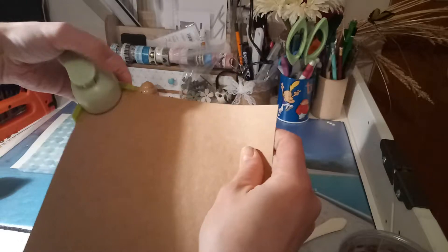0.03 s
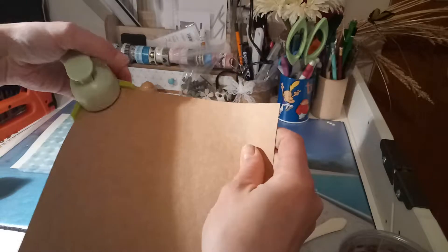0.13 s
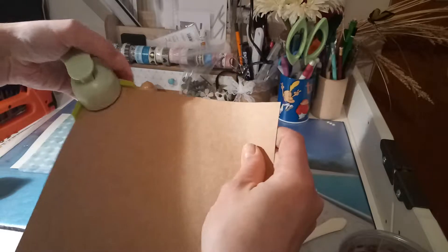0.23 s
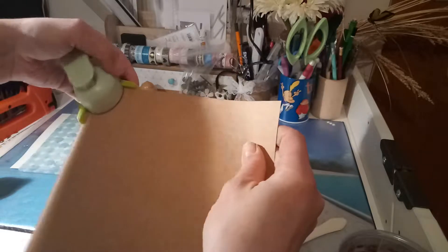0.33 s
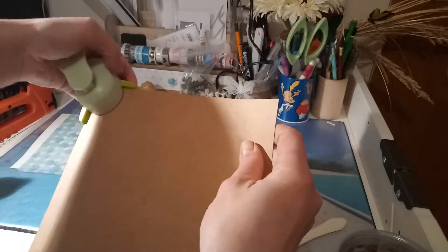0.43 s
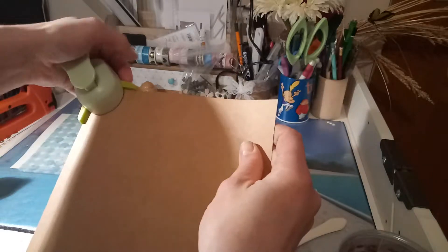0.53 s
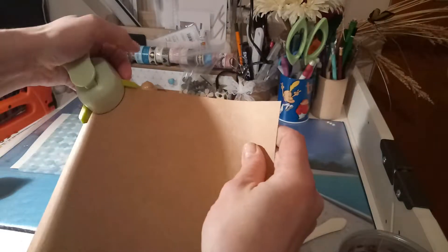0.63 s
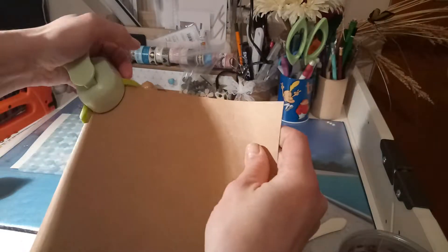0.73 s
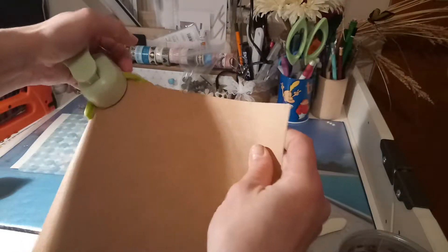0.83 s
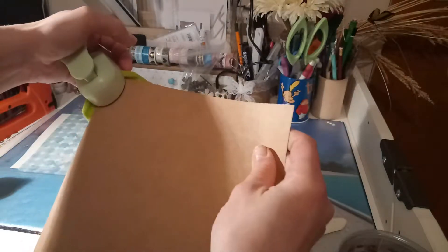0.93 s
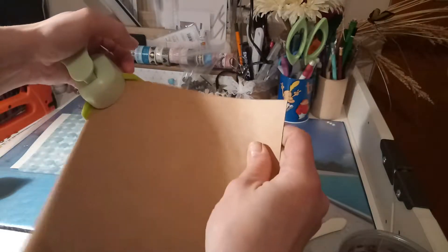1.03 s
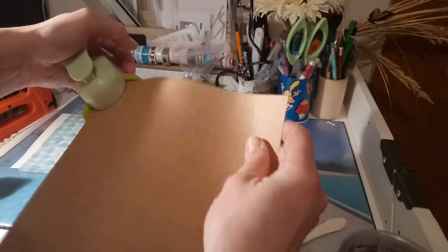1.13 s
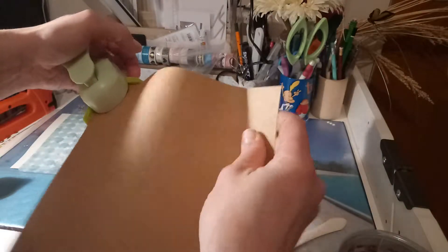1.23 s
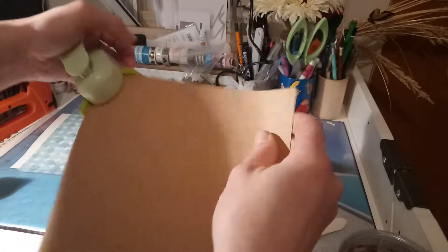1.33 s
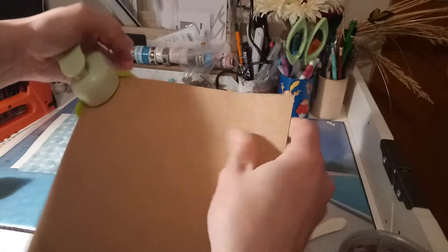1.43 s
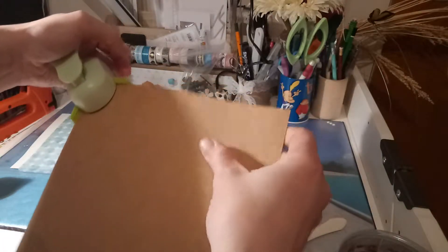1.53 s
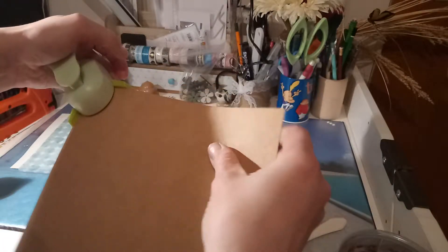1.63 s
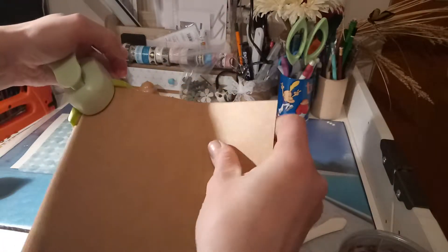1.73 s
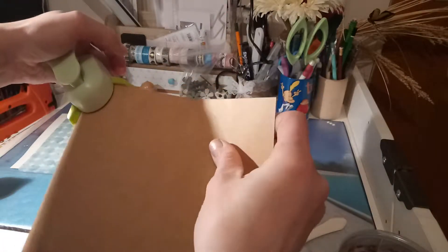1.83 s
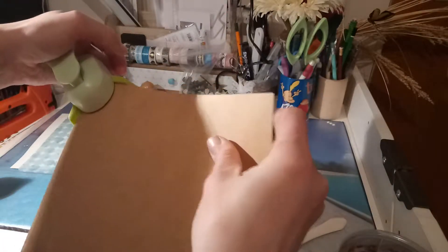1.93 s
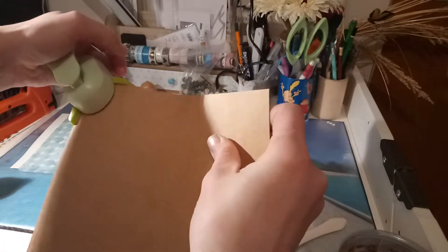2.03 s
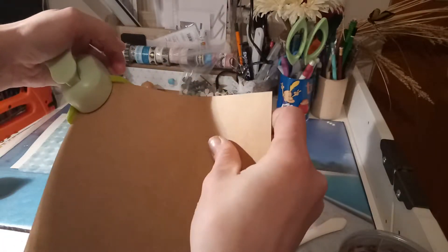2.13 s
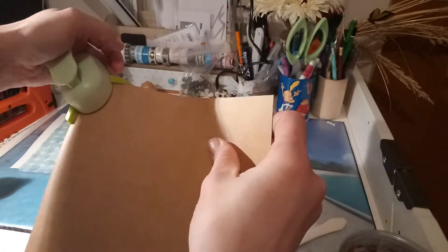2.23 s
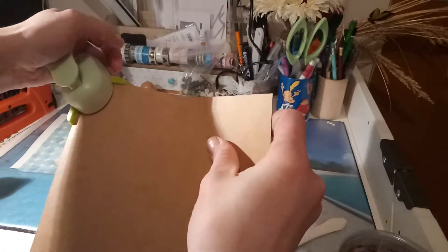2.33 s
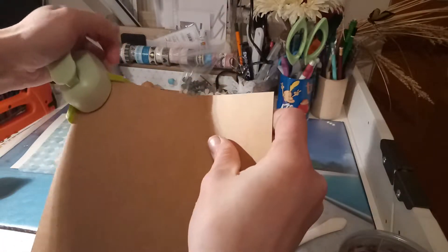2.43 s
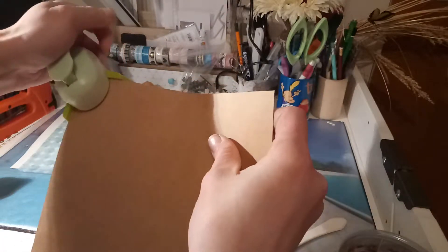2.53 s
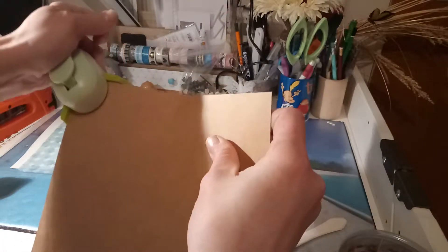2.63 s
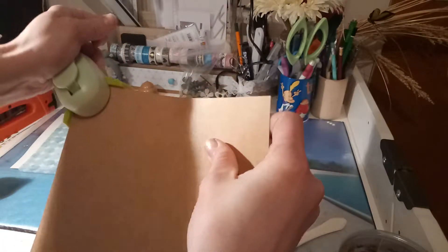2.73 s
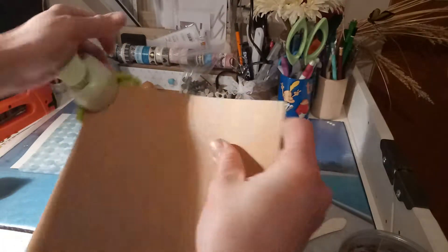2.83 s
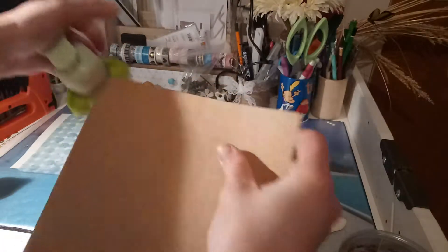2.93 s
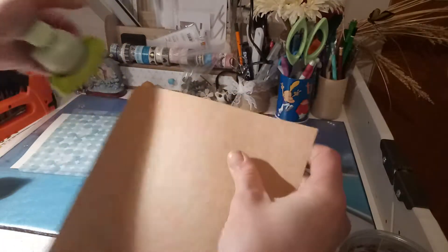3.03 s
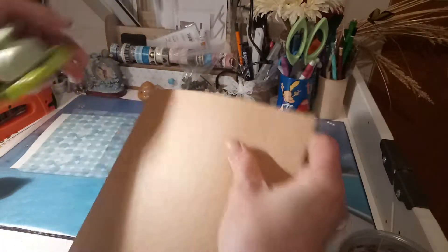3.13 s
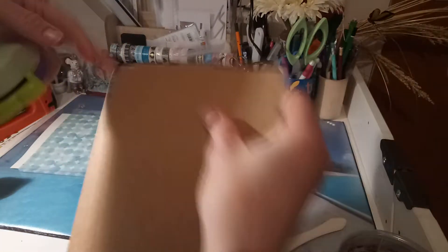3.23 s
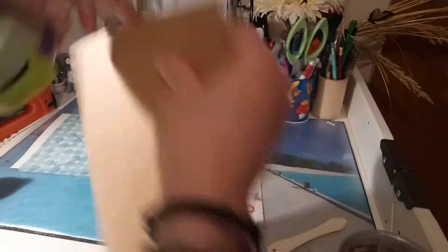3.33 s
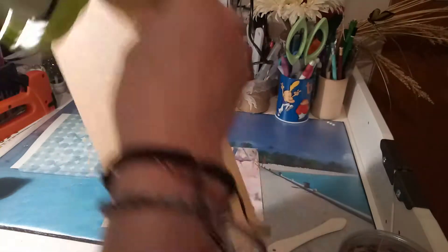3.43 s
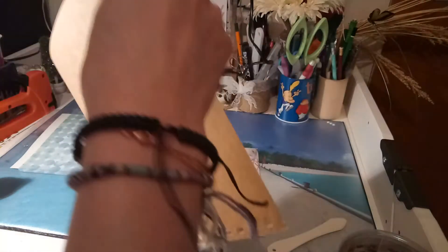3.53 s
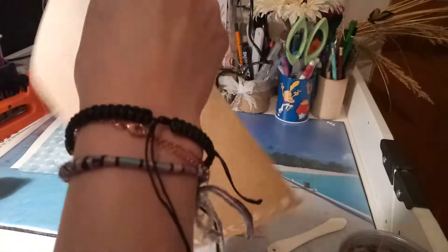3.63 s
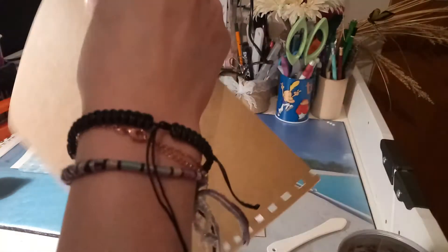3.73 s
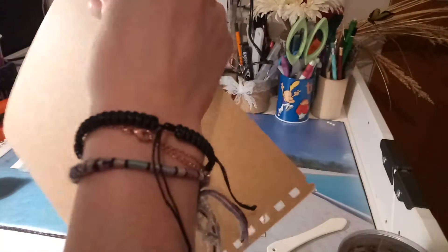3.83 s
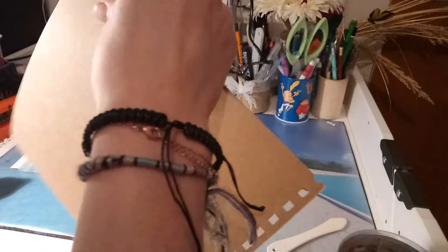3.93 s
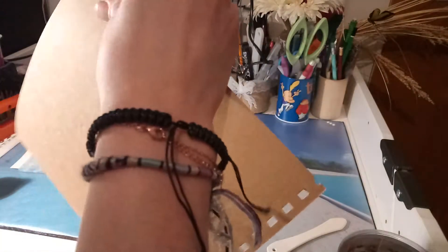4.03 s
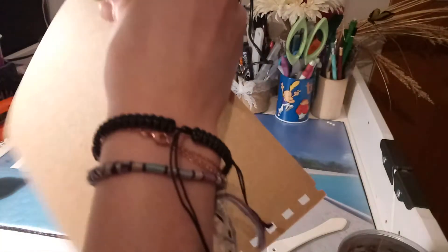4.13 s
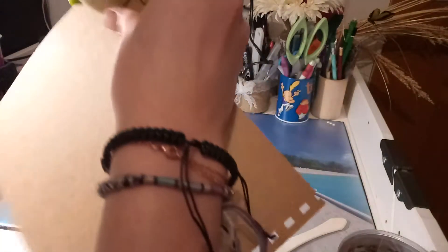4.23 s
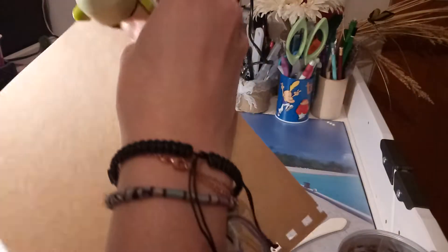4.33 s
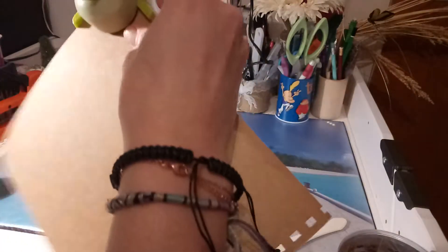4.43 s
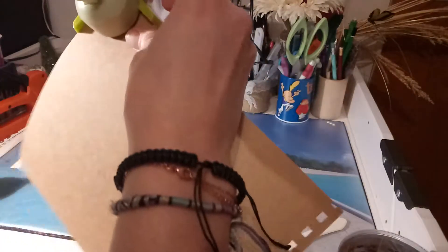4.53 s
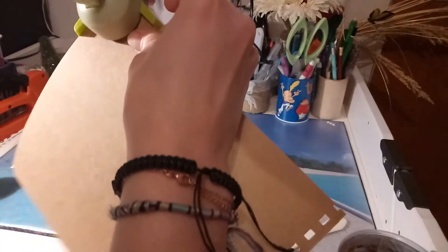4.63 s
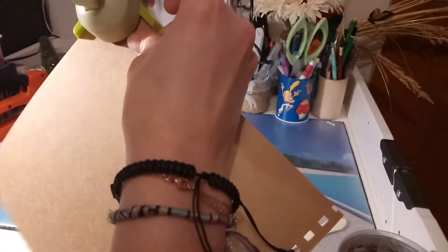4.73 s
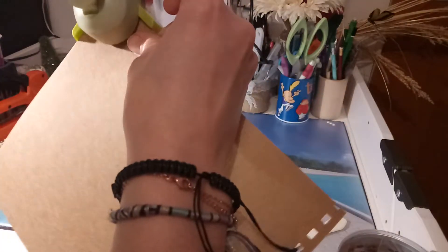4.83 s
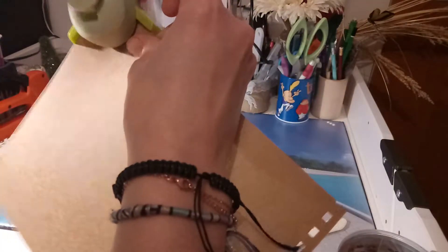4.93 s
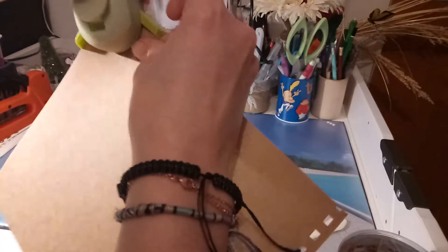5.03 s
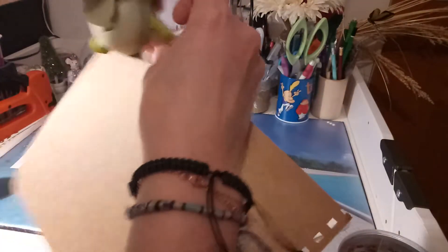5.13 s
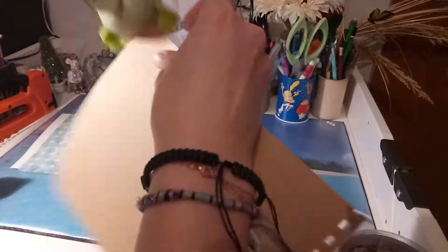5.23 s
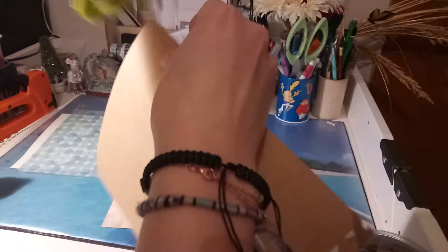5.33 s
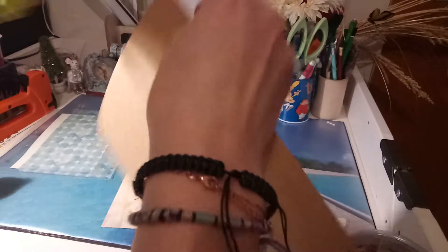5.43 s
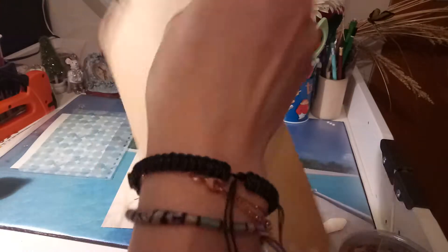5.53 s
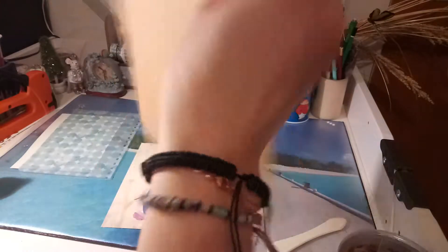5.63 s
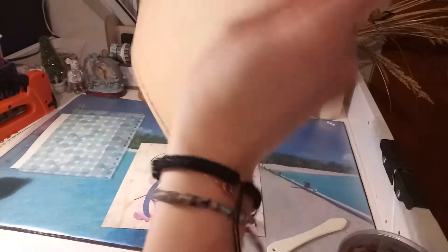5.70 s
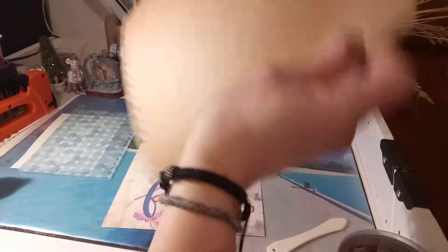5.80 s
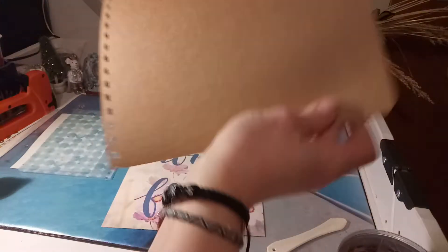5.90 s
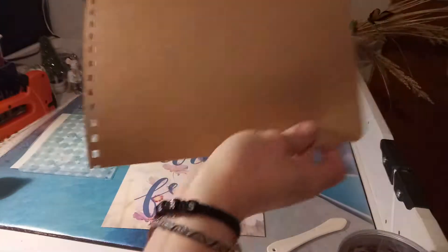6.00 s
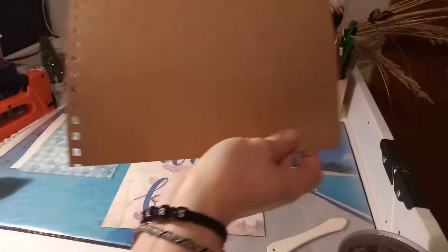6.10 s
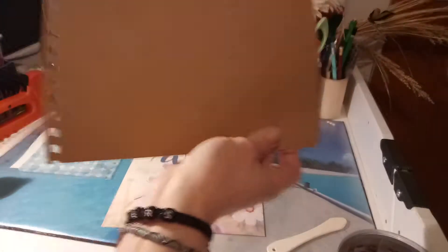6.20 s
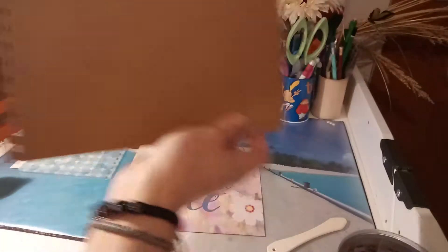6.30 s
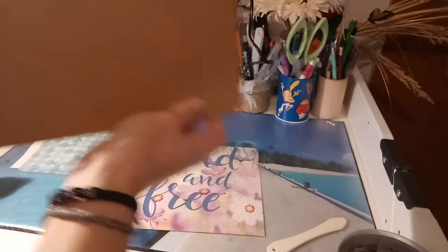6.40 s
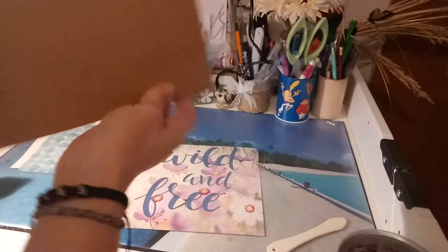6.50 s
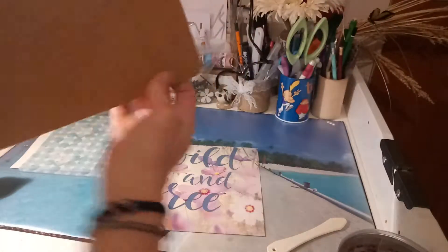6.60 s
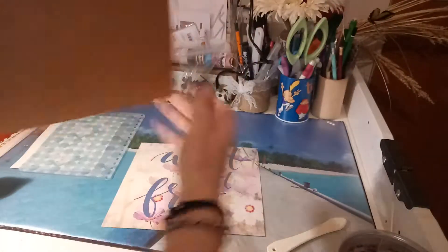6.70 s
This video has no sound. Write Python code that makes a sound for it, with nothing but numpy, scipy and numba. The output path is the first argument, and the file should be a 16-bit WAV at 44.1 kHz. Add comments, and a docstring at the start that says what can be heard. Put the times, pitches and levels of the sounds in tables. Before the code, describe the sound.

A stiff sheet is pushed into a plastic corner punch, with dry scrapes, small knocks and buckling pops. The punch cracks through with a quick double clack, the sheet is turned with rustles and hisses, then a second cut clacks. Finally the sheet is swung away with a loud, fluttering flap. Close phone microphone, small room, sound mostly from the right.

```python
"""At a desk in a small room, a sheet of kraft paper is worked into a plastic corner punch and cut twice.
The sheet hisses and scrapes as filtered noise made of tiny catches, and wobbles as short fluttering tones.
Buckles, creases and knocks are short filtered bursts; the punch cracks through the fibres and clacks back.
A phone close by hears the paper and punch mostly from the right, over a faint rumble and hiss."""
import sys
import numpy as np
from scipy import signal
from scipy.fft import rfft, irfft
from scipy.io import wavfile
from scipy.ndimage import uniform_filter1d, minimum_filter1d, map_coordinates
from numba import njit

SR = 44100
rng = np.random.default_rng(int(sys.argv[2]) if len(sys.argv) > 2 else 0)


def store_pcm(level_fs):
    """Save levels as 16-bit WAV."""
    pcm = np.round(np.clip(level_fs, -1, 1) * 32767).astype(np.int16)
    wavfile.write(sys.argv[1], SR, np.atleast_2d(pcm).T)


N = 298116
TIME = np.arange(N) / SR


def undb(db):
    """Turn decibels into gain."""
    return 10 ** (np.asarray(db) / 20)


def unit(x):
    """Scale to unit energy."""
    return x / np.sqrt(np.sum(x ** 2))


def read(points, hz):
    """Read a colour table between its points, on a log-frequency axis."""
    f, value = np.transpose(points)
    return np.interp(np.log(np.maximum(hz, 1)), np.log(f), value)


def response(colour, thud_db=0, bright_db=0, pop_hz=1250, pop_db=0, octaves=1.0, size=2048):
    """Filter for a colour plus a bass shelf, a treble shelf and one broad resonance; it never sounds early."""
    hz = np.arange(size // 2 + 1) * SR / size
    thud = thud_db / (1 + (hz / 620) ** 4)
    bright = bright_db * (1 - 1 / (1 + (hz / 2900) ** 4))
    pop = pop_db * np.exp(-(np.log2((hz + 1) / pop_hz) / octaves) ** 2)
    # folding the cepstrum gives minimum phase: the energy comes as early as it can
    cepstrum = irfft(np.log(undb(read(colour, hz) + thud + bright + pop)))
    cepstrum[1:size // 2] *= 2
    cepstrum[size // 2 + 1:] = 0
    return unit(irfft(np.exp(rfft(cepstrum))))


def through(x, ir):
    """Convolve, keeping the length."""
    return signal.fftconvolve(x, ir)[:len(x)]


def add(track, s, sound):
    """Mix a stereo sound into the track at a time in seconds."""
    start = max(int(s * SR), 0)
    track[:, start:start + sound.shape[1]] += sound[:, :N - start]


def walk(rate):
    """A random line that wanders around zero, with a new target `rate` times a second."""
    k = int(SR / rate)
    steps = np.repeat(rng.standard_normal(N // k + 1), k)
    return 2.0 * uniform_filter1d(steps, k)[:N]


def swell(s, rise_s, fall_s, shape=1.62):
    """Power of one movement: it gathers speed, then slows; shape 1 is a pointed swell, 2 a bell."""
    u = TIME - s
    near = (u > -4 * rise_s) & (u < 4 * fall_s)
    power = np.zeros(N)
    power[near] = np.exp(-2 * np.maximum(-u[near] / rise_s, u[near] / fall_s) ** shape)
    return power


# faint background: f/Hz, level/dB
QUIET_COLOUR = [(30, -0.5), (130, 7.5), (400, -4), (600, -6.5), (1450, -9.5), (6900, -9.5), (9000, -21),
                (13700, -29), (14800, -3), (16000, -9)]


def quiet(level_db=-63.5, left_db=-3):
    """Faint room rumble and microphone hiss: separate noise in each port, the left one softer."""
    both = np.array([through(rng.standard_normal(N), response(QUIET_COLOUR)) for _ in range(2)])
    return both * undb(level_db + np.array([[left_db], [0]]))


PORT_LAG = 10  # samples by which the left port hears the direct sound later
BASS_SHADE_DB = -4  # bass in the left port against the right
ROOM_T60_LOW_S, ROOM_T60_HIGH_S = 0.41, 0.3  # time for the bass and the treble to fade by 60 dB


def room(wet_db, left_db, near_db=-2, near_s=0.0029, build_s=0.0015, split_hz=700, size=12288):
    """Paths from one spot to the two ports: direct sound, then echoes off desk clutter and walls."""
    t = np.arange(size) / SR
    noise = rng.standard_normal((2, size))
    low_pass = signal.butter(1, split_hz, fs=SR)
    bass = signal.lfilter(*low_pass, noise)
    bass_fade = np.exp(-np.log(1000) * t / ROOM_T60_LOW_S)
    treble_fade = np.exp(-np.log(1000) * t / ROOM_T60_HIGH_S)
    walls = bass * bass_fade + (noise - bass) * treble_fade
    # the walls answer from all around, so they lean less to one side
    sides = np.array([[1], [-1]]) / 2
    walls = walls * undb(-sides * left_db / 2)
    clutter = noise * abs(noise) * np.exp(-t / near_s) * (t > .001)
    echoes = unit(walls * (1 - np.exp(-t / build_s))) + undb(near_db) * unit(clutter)
    direct = np.array([signal.unit_impulse(size, PORT_LAG), signal.unit_impulse(size)])
    paths = np.sqrt(2) * unit(unit(direct) + undb(wet_db) * unit(echoes))
    shaded = paths + (undb(sides * BASS_SHADE_DB) - 1) * signal.lfilter(*low_pass, paths)
    return shaded * undb(sides * left_db)


def place(x, wet_db, left_db):
    """Put a short sound at its own spot on the desk; left_db is the left level against the right."""
    return signal.fftconvolve(x[None], room(wet_db, left_db), axes=1)


def roam(x, wet_db, left_db, size=16384):
    """Cross-fade a long sound through freshly drawn echoes, as if its spot kept moving."""
    out, padded = np.zeros((2, N)), np.pad(x, (0, size))
    for start in range(0, N, size // 2):
        fade = signal.windows.hann(size, sym=False)
        if start == 0:
            fade[:size // 2] = 1
        add(out, start / SR, place(padded[start:start + size] * fade, wet_db, left_db))
    return out


# the hand pushes the sheet along:
# t/s at the fastest, speeding up/s, slowing down/s, level/dB, edge scrape against the slide/dB
STROKES = [(0.026, 0.033, 0.029, -47, -1.5), (.213, 0.014, 0.026, -48, -23),
           (0.459, 0.041, 0.015, -53.5, -9), (.94, 0.071, 0.051, -55.5, 3),
           (1.074, 0.034, 0.017, -43, -4.5), (1.222, 0.021, 0.017, -47, 3.5),
           (1.56, 0.11, 0.027, -42.5, -2.5), (1.715, 0.21, 0.084, -52, 2.5),
           (2.032, 0.028, 0.0087, -46.5, 0.5), (2.212, 0.012, 0.013, -47.5, -11.5),
           (2.612, 0.065, 0.011, -60.5, 1), (2.964, 0.092, 0.12, -45.5, 1.5),
           (3.133, 0.027, 0.041, -40.5, -2), (3.35, 0.28, 0.0073, -53.5, 6),
           (3.513, 0.13, 0.036, -41.5, -8.5), (3.673, 0.027, 0.073, -43, -7.5),
           (3.78, 0.055, 0.028, -45, -4), (3.899, 0.09, 0.025, -52, -1.5),
           (4.139, 0.11, 0.074, -42.5, -7.5), (4.381, 0.045, 0.034, -40, -5.5),
           (4.569, 0.036, 0.011, -49.5, 1.5), (5.324, 0.094, 0.0075, -35, -5),
           (5.66, 0.048, 0.088, -48, -10), (5.769, 0.14, 0.018, -47.5, -4), (5.905, 0.07, 0.021, -46, -6.5),
           (6.07, 0.022, 0.056, -41, -4), (6.242, 0.042, 0.059, -31.5, 1), (6.57, 0.072, 0.11, -55, 1.5),
           (6.737, 0.026, 0.01, -42.5, -13)]
# fingers keep the held sheet stirring faintly: start t/s, end t/s, level/dB
GRIPS = [(0.86, 1.975, -60), (2.703, 4.676, -64.5)]
# the sheet is bent and settles with a low rustle: t/s, level/dB before the flex trim, settling/s
FLEXES = [(.04, -46, 0.063), (0.476, -52, 0.033), (.89, -56, 0.28), (1.44, -44.5, 0.11),
          (1.719, -40, 0.075), (2.12, -43, 0.025), (2.98, -47.5, 0.13), (3.35, -45.5, 0.12),
          (3.696, -46, 0.02), (5.638, -48, 0.057), (6.26, -33.5, 0.052), (6.65, -41, 0.055)]
GRIP_FADE_S, FLEX_RISE_S = 0.0293, 0.022
STROKE_RIPPLE_DB = -8  # a scraping edge sets small ripples going in the sheet
# every snap or clack leaves the sheet shivering: levels against its table level
SHIVER_EDGE_DB, SHIVER_RIPPLE_DB, SHIVER_FLEX_DB = -16, -18.5, -24.5
SHIVER_RISE_S, SHIVER_FALL_S = 0.0013, 0.038


def handling():
    """Levels in dB of slide, scrape, ripple and flex: strokes, grip, bends and shivers add in power."""
    slide, scrape = np.zeros((2, N))
    for s, rise_s, fall_s, db, edge_db in STROKES:
        stroke = swell(s, rise_s, fall_s) * undb(db) ** 2
        slide += stroke
        scrape += stroke * undb(edge_db) ** 2
    for start, end, db in GRIPS:
        held = 1. * ((TIME > start) & (TIME < end))
        grip = uniform_filter1d(held, int(GRIP_FADE_S * SR)) * undb(db) ** 2
        slide += grip
        scrape += grip
    ripple = scrape * undb(STROKE_RIPPLE_DB) ** 2
    flex = sum(swell(s, FLEX_RISE_S, settle_s) * undb(db) ** 2 for s, db, settle_s in FLEXES)
    shiver = np.zeros(N)
    for s, db, *_ in SNAPS + CLACKS:
        shiver += swell(s + 2 * SHIVER_RISE_S, SHIVER_RISE_S, SHIVER_FALL_S) * undb(db) ** 2
    scrape = scrape + shiver * undb(SHIVER_EDGE_DB) ** 2
    ripple = ripple + shiver * undb(SHIVER_RIPPLE_DB) ** 2
    flex = flex + shiver * undb(SHIVER_FLEX_DB) ** 2
    return 10 * np.log10(np.array([slide, scrape, ripple, flex]) + 1e-12)


def friction(db, colour, grain_db, slip_db, slip_rate, catches_per_s=SR / 4):
    """Tiny catches of paper fibre, of random sizes, coming in uneven slips."""
    sizes = undb(grain_db * np.minimum(rng.exponential(1, N), 7))
    catches = rng.standard_normal(N) * sizes * (rng.random(N) < catches_per_s / SR)
    level = undb(db + slip_db * walk(slip_rate))
    return through(catches / catches.std() * level, response(colour))


def buckle(x, patchy_db=2.2, per_s=45, per_octave=1.5):
    """As the sheet bends, its contact patches come and go, each with its own colour."""
    hz, t, frames = signal.stft(x, SR)
    octave = np.log2(np.maximum(hz, hz[1]) / hz[1])
    spots = np.meshgrid(octave * per_octave, t * per_s, indexing="ij")
    patches = map_coordinates(rng.standard_normal(frames.shape), spots)
    return signal.istft(frames * undb(patchy_db * patches), SR)[1][:N]


# low rustle of the bent sheet, and its small ripples: f/Hz, level/dB
FLEX_COLOUR = [(60, -5), (125, 6.5), (320, -2), (600, -8.5), (1200, -59)]
RIPPLE_COLOUR = [(60, -27.5), (200, -8.5), (390, 7.5), (720, -1), (1300, -35)]


def bending(ripple_db, flex_db):
    """The flexing sheet rustles low, with small ripples above."""
    ripple = friction(ripple_db, RIPPLE_COLOUR, grain_db=3, slip_db=1.4, slip_rate=40)
    flex = friction(flex_db, FLEX_COLOUR, grain_db=2.5, slip_db=1.4, slip_rate=34)
    return roam(undb(-2.5) * flex + ripple, wet_db=-5.5, left_db=-5.5)  # -2.5 is the flex trim


# the bent sheet wobbles: t/s at the crest, level/dB, pitch f/Hz, half length/s
WOBBLES = [(0.821, -53, 142, 0.013), (1.433, -35, 242, 0.0042), (1.445, -40, 165.6, 0.023),
           (1.719, -51, 198, 0.01), (2.965, -42.5, 195, 0.01), (6.059, -35, 159, 0.011),
           (6.095, -38, 123, 0.014), (6.222, -27.5, 254.5, 0.011), (6.262, -27.5, 356, 0.011),
           (6.283, -27, 350.5, 0.023)]
# bending modes of the sheet: multiple of the pitch, level/dB
BENDS = [(0.998, 3), (1.81, -9.5)]


def wobbles(rough=0.2):
    """Bending modes swell, flutter and die as the sheet swings."""
    out = np.zeros(N)
    for multiple, mode_db in BENDS:
        flutter = 1 + rough * multiple * walk(130)
        for s, db, hz, half_s in WOBBLES:
            near = abs(TIME - s) < 4 * half_s
            since = TIME[near] - s
            bell = np.exp(-(since / half_s) ** 2 / 2)
            phase = 2 * np.pi * (multiple * hz * since + rng.random())
            out[near] += undb(db + mode_db) * bell * np.sin(phase) * flutter[near]
    return out


# the sliding sheet, and its bright swish: f/Hz, level/dB
SLIDE_COLOUR = [(1200, -12), (2600, 0.5), (4000, -0.5), (6600, 4), (8200, -9.5), (10500, -22), (13800, -46),
                (15000, -4), (16000, -55)]
SWISH_COLOUR = [(4000, -27.5), (7000, 7), (11500, -9.5), (15000, -6)]
# the sheet sweeps flat over the mat with a bright swish: t/s at the fastest, half length/s, level/dB
SWEEPS = [(0.45, 0.05, -61), (1.55, 0.055, -45), (3.135, 0.035, -47), (3.515, 0.07, -42),
          (5.31, 0.035, -42)]
# dB per dB of sliding, dB per dB of sliding over scraping, offset in dB
SWISH_GROWTH, SWISH_FLATNESS, SWISH_DB = 1.438, 0.093, 9


def rubbing(slide_db, scrape_db):
    """The flat sheet slides; a fast, flat stroke is brighter as its bright swish grows quicker."""
    slide = friction(slide_db, SLIDE_COLOUR, grain_db=4.5, slip_db=1.1, slip_rate=90)
    swish_db = SWISH_GROWTH * slide_db + SWISH_FLATNESS * (slide_db - scrape_db) + SWISH_DB
    sweeps = sum(swell(s, half_s, half_s) * undb(db) ** 2 for s, half_s, db in SWEEPS)
    swish_db = 10 * np.log10(undb(swish_db) ** 2 + sweeps)
    swish = friction(swish_db, SWISH_COLOUR, grain_db=3.5, slip_db=.9, slip_rate=60)
    return roam(buckle(slide) + swish, wet_db=11.5, left_db=-7.0)


# the edge drags on the punch and the desk:
# t/s at the hardest push, building up/s, dying/s, level/dB, pitch f/Hz at the hardest push
DRAGS = [(0.455, 0.074, 0.071, -57.5, 1490), (1.232, 0.035, 0.024, -46.5, 510),
         (3.201, 0.034, 0.014, -45.5, 1240), (4.149, 0.11, 0.017, -42.5, 1170)]
DRAG_WIDTH, DRAG_RISE_OCT_PER_S = 0.35, 0.47  # width as a share of the pitch; climb in octaves per s


def drags():
    """Catches of a dragged edge ring one resonance, which climbs as the push stiffens the sheet."""
    out = np.zeros(N)
    for s, rise_s, fall_s, db, hz in DRAGS:
        power = swell(s, rise_s, fall_s)
        near = power > 0
        pitch = hz * 2 ** (DRAG_RISE_OCT_PER_S * (TIME[near] - s))
        turn = np.exp(2j * np.pi * np.cumsum(pitch) / SR)
        catches = rng.laplace(size=len(turn)) * rng.exponential(size=len(turn))
        # shift the pitch down to zero, low-pass, shift back: a filter that follows the pitch
        low_pass = signal.butter(2, hz * DRAG_WIDTH / 2, fs=SR)
        rung = (turn * signal.lfilter(*low_pass, catches / turn)).real
        out[near] += undb(db) * np.sqrt(power[near]) * rung / rung.std()
    return out


# the scraping edge: f/Hz, level/dB
SCRAPE_COLOUR = [(300, -32.5), (600, 3), (1150, 5), (1600, 3.5), (2400, 1), (4500, -29)]
CRINKLES_PER_S, CRINKLE_DB = 90, -7  # lone fibre ticks, and their level against the scrape


def scraping(scrape_db):
    """The sheet's edge scrapes and drags, and now and then a fibre lets go with a tick of its own."""
    scrape = friction(scrape_db, SCRAPE_COLOUR, grain_db=3.0, slip_db=1.5, slip_rate=90)
    crinkle = friction(scrape_db + CRINKLE_DB, SLIDE_COLOUR, grain_db=3, slip_db=1, slip_rate=20,
                       catches_per_s=CRINKLES_PER_S)
    return roam(buckle(scrape + crinkle) + drags(), wet_db=2.5, left_db=-3.5)


def fracture(ms, crackle_db, size=4096):
    """A sudden give, with a swelling and fading run of fibres letting go one after another."""
    u = np.arange(size) / SR * 1000 / ms
    fibres = rng.standard_normal(size) * np.sqrt(abs(u)) * np.exp(-u ** 2)
    # a longer crackle is also stronger against the give
    force = rfft(unit(signal.unit_impulse(size) + undb(crackle_db) * ms * unit(fibres)))
    # tearing has no pitch of its own, so its spectrum is kept even
    return unit(irfft(force / (abs(force) + 1e-6))[:size // 2])


MODE_SCATTER = 0.029  # share by which a ring's pitch shifts with the grip


def ring(modes, size=4096):
    """Fading modes of a struck part, a little different at every blow."""
    t = np.arange(size) / SR
    out = np.zeros(size)
    for hz, db, t60 in modes:
        pitch = hz * (1 + MODE_SCATTER * rng.standard_normal())
        out += undb(db) * unit(np.sin(2 * np.pi * pitch * t) * np.exp(-np.log(1000) * t / t60))
    return out


# the sheet or the hand knocks against the punch's guide:
# t/s, level/dB before the blow boost, thud/dB, brightness/dB, pitch of the knock f/Hz
KNOCKS = [(0.026, -21.5, -13, -1.5, 1627), (1.087, -24, 3, -0.5, 1330), (2.0388, -21.5, 6, -0.5, 1680),
          (2.825, -32.5, 12.5, 6.5, 1140), (2.844, -25, -8.5, -17.5, 1050),
          (4.1674, -21.5, 2.5, -9.5, 1380), (4.212, -32.5, 12.5, 7, 1220), (4.616, -39, 1, -5, 1010),
          (4.629, -34, -6, -11, 1160), (4.659, -37, 2, -9, 1140)]
# the guide and the desk under it ring: f/Hz, level/dB, 60 dB fade/s
GUIDE_MODES = [(178, -2, 0.28), (417.4, -3, 0.37), (1170, -12, 0.032), (1307, -18, 0.031), (1602, 1, 0.025),
               (1892, 1, 0.019), (5000, 8, 0.036)]
REBOUND_S, REBOUND_DB = 0.0076, -14.5  # a knock touches a second time


def knocks():
    """A hard contact at the punch's guide and its rebound: a compact knock with a short hollow ring."""
    out = np.zeros((2, N))
    for s, db, thud_db, bright_db, hz in KNOCKS:
        body = ring(GUIDE_MODES)
        rebound = undb(REBOUND_DB) * signal.unit_impulse(len(body), int(REBOUND_S * SR))
        force = signal.unit_impulse(len(body)) + rebound
        contact = through(force, response(SNAP_COLOUR, thud_db, bright_db, hz, pop_db=14.0))
        knock = contact + undb(-9.5) * unit(through(body, contact))
        add(out, s, place(undb(db) * unit(knock), wet_db=0.5, left_db=-5.5))
    return out


# the sheet buckles or slaps:
# t/s, level/dB before the blow boost, thud/dB, brightness/dB, crackle length/ms, pitch of the pop f/Hz
SNAPS = [(0.855, -37, 8.5, 7, 2.7, 1060), (1.4091, -23, 11, 15.5, 0.79, 1120),
         (1.418, -29, 9.5, -2, 1, 1060), (1.641, -33, 18, 14, 2.3, 1260), (2.954, -33, 47, 8, 9.8, 910),
         (3.327, -30.5, 8.5, 16.5, 3.7, 1220), (3.671, -34, 2, 23, 0.65, 1250),
         (3.928, -40.5, 35.5, 42, 0.95, 1307), (5.529, -38.5, 7, 4.5, 12.3, 1300),
         (6.211, -13.5, 13, 16, 0.89, 850), (6.6294, -30.5, 18.5, 15, 6.6, 1200),
         (6.655, -26.5, -0.5, 12.5, 1.17, 1010)]
# small creases let go: t/s, level/dB before the blow boost, f/Hz
CREASES = [(0.143, -53, 900), (0.991, -44.5, 1400), (1.33, -45, 1380), (1.394, -45.5, 1100),
           (1.967, -50.5, 5000), (2.895, -48, 6160), (3.058, -39.5, 1420)]
# colour of snaps, creases and knocks: f/Hz, level/dB
SNAP_COLOUR = [(40, -18.5), (150, -9.5), (420, -2.5), (680, -12), (2800, -15.5), (6500, -15.5), (9000, -30),
               (13000, -45), (15300, -35.5)]


def snaps():
    """The stiff sheet flips between two bends with a dead, crackling pop; small creases only tick."""
    out = np.zeros((2, N))
    for s, db, thud_db, bright_db, ms, hz in SNAPS:
        colour = response(SNAP_COLOUR, thud_db, bright_db, hz, pop_db=15.0)
        pop = through(fracture(ms, crackle_db=1), colour)
        add(out, s, place(undb(db) * unit(pop), wet_db=8.5, left_db=-7.5))
    for s, db, hz in CREASES:
        tick = through(fracture(ms=3.6, crackle_db=-1), response(SNAP_COLOUR, pop_hz=hz, pop_db=8))
        add(out, s, place(undb(db) * unit(tick), wet_db=4.5, left_db=-12.5))
    return out


# the punch bites, springs back and knocks:
# t/s, level/dB before the blow boost, thud/dB, brightness/dB, crackle length/ms, pitch of the clack f/Hz
CLACKS = [(2.629, -26, 12.5, 11, 4, 1130), (2.663, -35, 16, 14, 1.2, 1430),
          (2.681, -17.5, 19, 16, 2.5, 1540), (2.687, -19.5, 11.5, 8.5, 0.82, 1250),
          (4.9854, -18, -2, 2, 2.9, 1370), (5.0095, -19, 16.5, 11, 3.3, 1360),
          (5.0162, -30, 28, 16, 2, 1420), (5.194, -30, 10.5, -2, 0.33, 1210),
          (5.339, -26.5, 15, 13, 0.43, 1750), (6.0354, -17, 15.5, 6, 2.2, 2210),
          (6.053, -29, 14, -4, 5, 2430)]
# the crack of the punch: f/Hz, level/dB
PUNCH_COLOUR = [(50, -12), (150, -6), (420, -16), (750, -1), (2400, 1), (4000, -5.5), (7000, -4),
                (9500, -16), (13000, -30), (15300, -16.5)]
# the punch's shell and spring ring: f/Hz, level/dB, 60 dB fade/s
PUNCH_MODES = [(420, -8, 0.077), (1574, -0.5, 0.045), (2330, -6, 0.17)]


def punch():
    """The die shears the paper and hits its stop; every blow rings the shell and spring."""
    out = np.zeros((2, N))
    for s, db, thud_db, bright_db, ms, hz in CLACKS:
        force = fracture(ms, crackle_db=14)
        colour = response(PUNCH_COLOUR, thud_db, bright_db, hz, pop_db=10.5, octaves=0.47)
        crack = unit(through(force, colour))
        shell = ring(PUNCH_MODES)
        crack = np.pad(crack, (0, len(shell) - len(crack)))
        clack = crack + undb(-10.0) * unit(through(shell, crack))
        add(out, s, place(undb(db) * clack, wet_db=3.5, left_db=-6))
    return out


# the sheet is lifted towards the middle and put back: t/s, left against right/dB
SWING = [(5.45, 0.5), (6.15, 4), (6.65, 1)]
BLOW_BOOST_DB = 25.0  # shared by snaps, knocks and punch


def scene():
    """Paper and punch share one desk and one room."""
    slide_db, scrape_db, ripple_db, flex_db = handling()
    swinging = roam(wobbles(), wet_db=-18, left_db=-2.5)
    paper = bending(ripple_db, flex_db) + swinging + rubbing(slide_db, scrape_db) + scraping(scrape_db)
    blows = undb(BLOW_BOOST_DB) * (knocks() + snaps() + punch())
    shift_db = np.interp(TIME, *np.transpose(SWING))
    # the shift tilts the whole desk, not the background
    return (paper + blows) * undb(np.array([shift_db, -shift_db]) / 2) + quiet()


@njit
def follow(x, release):
    """Peak follower: jumps up at once, sinks slowly."""
    y, e = np.empty(len(x)), 0.
    for i in range(len(x)):
        e = max(x[i], e * release)
        y[i] = e
    return y


def record(dry, limit_db=-3, release_s=0.036, low_hz=42, top_hz=15700):
    """The phone drops the deep bass, ducks briefly under peaks above the limit and cuts the top."""
    bass_cut = signal.butter(2, low_hz, "highpass", fs=SR, output="sos")
    sound = signal.sosfilt(bass_cut, dry)
    peak = follow(abs(sound).max(axis=0), np.exp(-1 / (release_s * SR)))
    gain = np.minimum(1, undb(limit_db) / (peak + 1e-9))
    # start each dip slightly early and round its corners
    gain = uniform_filter1d(minimum_filter1d(gain, size=41), size=41)
    top_cut = signal.ellip(8, .2, 70, top_hz, fs=SR, output="sos")
    return signal.sosfilt(top_cut, sound * gain)


dry = scene()
out = record(dry)
store_pcm(out)
```